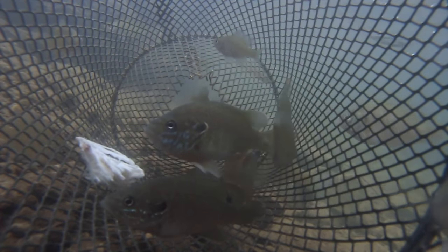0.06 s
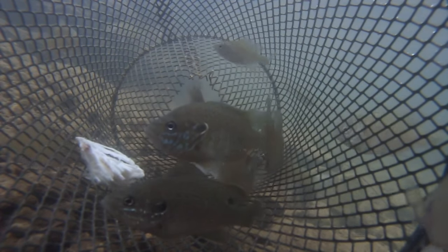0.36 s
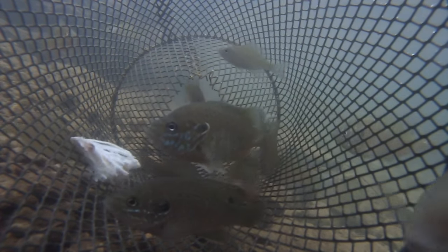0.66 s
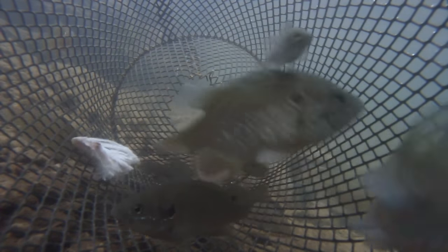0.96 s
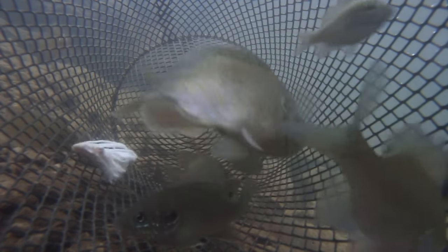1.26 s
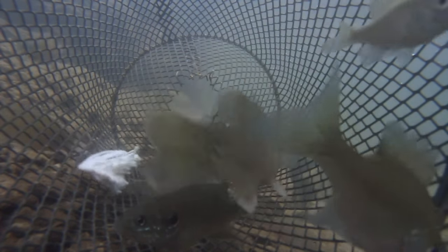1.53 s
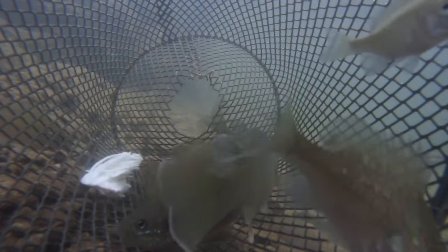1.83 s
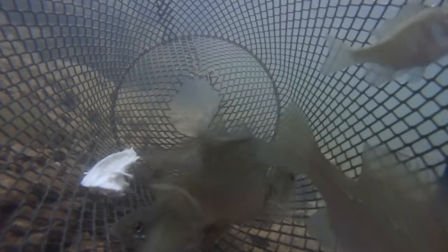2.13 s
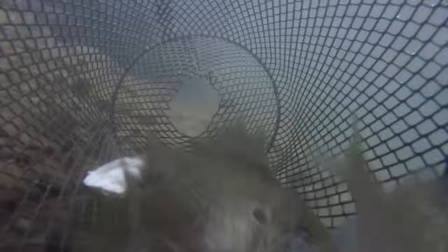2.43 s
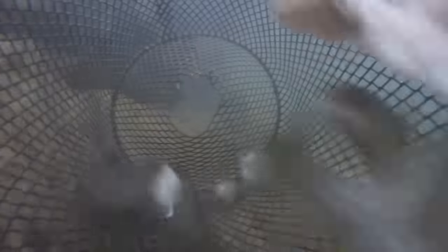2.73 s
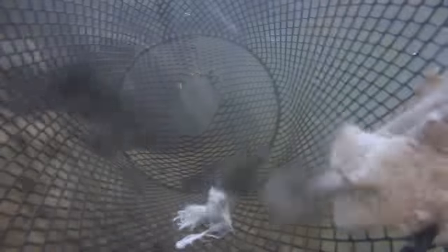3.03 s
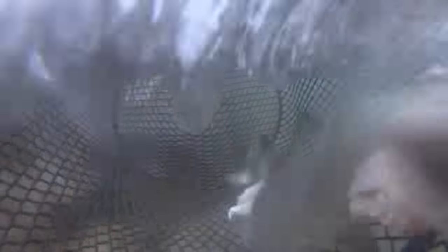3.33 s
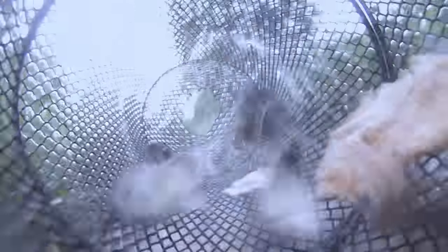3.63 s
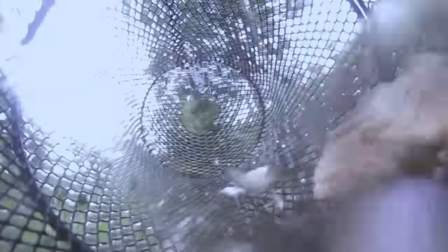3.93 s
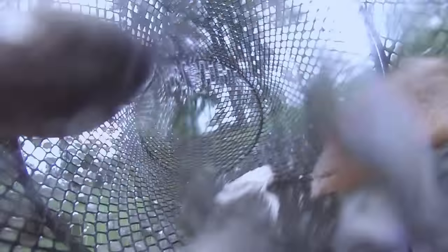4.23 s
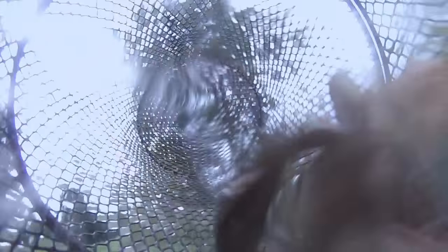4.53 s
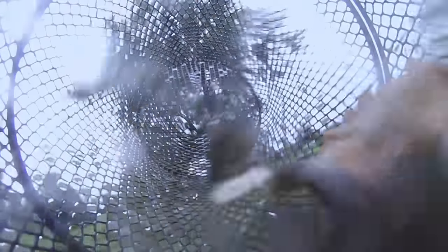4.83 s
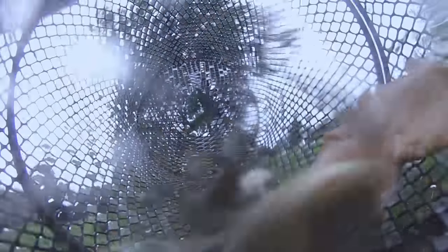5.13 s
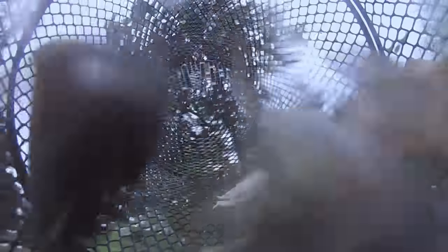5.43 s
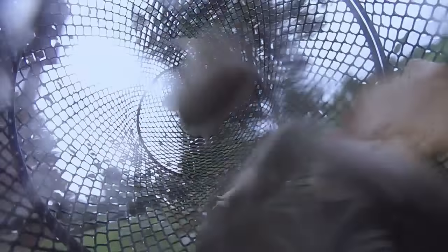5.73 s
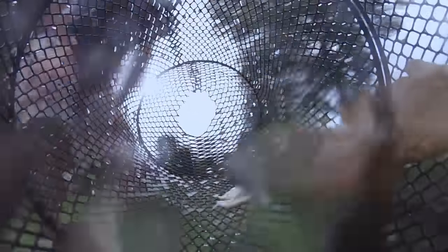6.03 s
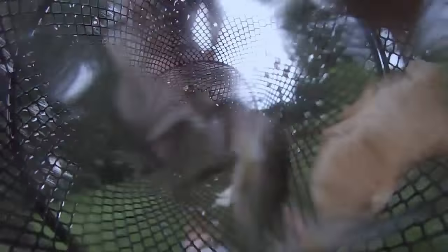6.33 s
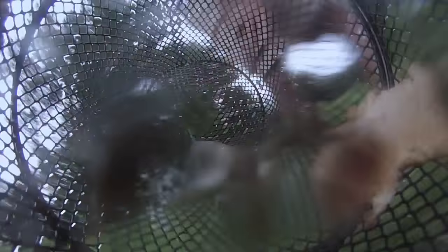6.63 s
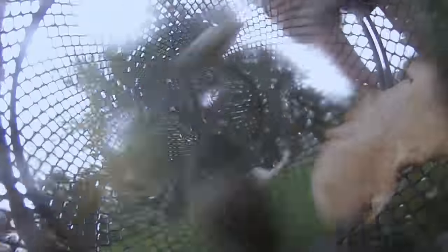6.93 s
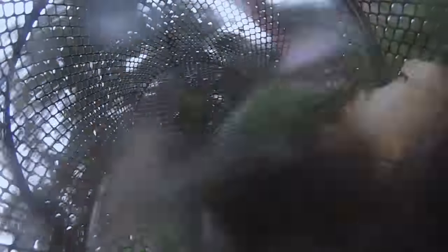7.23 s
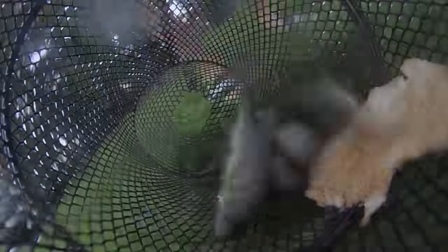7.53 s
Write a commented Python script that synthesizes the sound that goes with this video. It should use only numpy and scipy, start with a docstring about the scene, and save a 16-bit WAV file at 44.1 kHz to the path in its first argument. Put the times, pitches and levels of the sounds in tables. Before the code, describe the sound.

Inside a wire trap on a stream bed, a faint underwater hush is broken by a few dull knocks as fish bump the cage. After about two seconds the trap is hauled up with loud churning, bubbling and low thumps. Water then drains and spatters through the mesh in uneven spurts, drops smack right against the microphone, and fish flap on the wet wire.

```python
"""Hauling a wire fish trap

A stream bed, heard close up from a camera inside the trap. Fish bump the sunken cage with dull
knocks. The trap is hauled up: water churns and bubbles, then drains and spatters through the mesh.
Drops smack the housing right at the microphone and the stranded fish flap against the wet wire."""
import sys
import numpy as np
from scipy import signal
from scipy.fft import rfft, irfft, next_fast_len
from scipy.io import wavfile
from scipy.ndimage import map_coordinates

SR = 44100
rng = np.random.default_rng(int(sys.argv[2]) if len(sys.argv) > 2 else 0)


def master_out(mix):
    """Clip the mix to full scale and print it as 16-bit PCM to the path in sys.argv[1]."""
    frames = np.transpose(np.atleast_2d(mix))
    ceiling = np.clip(frames, -1, 1)
    pcm = np.round(ceiling * 32767).astype(np.int16)
    wavfile.write(sys.argv[1], SR, pcm)


N = 338235

# heaves of the trap and its thrashing fish: t/s, hold/s, sway/dB, churn/dB, spatter/dB
HEAVES = [(2.089, 0.069, -40.5, -53.5, -50), (2.253, 0.052, -22.5, -37.5, -46.5),
          (2.504, 0.07, -32, -18, -43), (2.617, 0.041, -7, -19.5, -27.5), (2.702, 0.085, -20, -12.5, -49),
          (2.926, 0.061, -17, -18, -34), (3.162, 0.035, -16.5, -30, -30), (3.205, 0.072, -21, -17.5, -25),
          (3.749, 0.034, -25, -18.5, -31), (3.828, 0.032, -10.5, -31, -28.5),
          (4.149, 0.044, -31, -24.5, -49), (4.309, 0.032, -27, -26.5, -28),
          (4.412, 0.081, -21, -23.5, -38.5), (4.641, 0.069, -18, -24, -31), (4.774, 0.06, -23, -45, -57),
          (4.927, 0.056, -29, -26.5, -32.5), (5.036, 0.066, -13.5, -20.5, -35.5),
          (5.285, .12, -17, -22.5, -53), (5.763, 0.018, -16, -35, -34), (5.85, 0.019, -13, -27.5, -31),
          (5.902, 0.026, -31, -15, -31.5), (6.027, 0.04, -34, -16, -29), (6.125, 0.071, -17, -22.5, -29.5),
          (6.372, 0.11, -24, -28, -29), (6.62, 0.041, -31, -27, -32), (6.771, .03, -16.5, -22, -37),
          (6.929, 0.019, -12.5, -30, -26.5), (7.004, 0.049, -22, -24, -26), (7.133, 0.058, -15, -24.5, -30),
          (7.281, 0.076, -31, -23, -29), (7.381, .05, -16, -27.5, -32.5), (7.568, 0.13, -21.5, -31, -33.5)]
# spectrum of water spattering off the mesh: f/Hz, level/dB
SPATTER_SPECTRUM = [(250, -12), (500, 7.5), (800, 1.5), (1080, -4), (1550, 3.5), (1850, 0), (2300, 4),
                    (2600, -2), (3000, -13.5), (4400, -22), (5300, -27), (6200, -35), (7200, -26),
                    (12000, -46)]
# spectrum of fine spray: f/Hz, level/dB
SPRAY_SPECTRUM = [(1500, -1.5), (3000, 12), (4400, 16.5), (5400, 11), (6250, 16.5), (7600, -3.5),
                  (9500, 3.5), (11500, -2.5), (13000, -2), (15000, -10)]


def water():
    """Water all round the microphone, leaving the mesh in uneven spurts as the trap is hauled."""
    sway, churn, spatter, spray = flow_strength()
    spurts = amp(5.28 * wobble(rate=59))
    flicks = spurts * amp(4.5 * wobble(rate=35))
    return (churning(sway, churn) + draining(spatter, spray, spurts, flicks)
            + escaping_air(churn, spatter, spray, flicks))


def flow_strength():
    """Envelopes of sway, churn, spatter and spray: each heave shifts water on top of the steady flow."""
    # first stir as the trap is gripped, then steady flow: t/s, churn/dB, spatter/dB, spray/dB
    stir = [(2.25, -48, -49.5, -67), (2.45, -30, -40, -65)]
    flow = [(2.5, -27, -34.5, -69), (2.67, -11.5, -29, -78), (2.79, -23.5, -32.5, -47),
            (2.97, -23, -31.5, -72), (3.16, -21, -48.5, -62), (3.41, -17.5, -30, -43.5),
            (3.78, -19, -33.5, -51), (4.06, -27, -40, -61), (4.26, -30, -40.5, -50.5),
            (4.69, -31, -42, -64), (5.38, -19.5, -28.5, -51.5), (5.69, -24.5, -35.5, -49),
            (6.26, -22.5, -35, -49.5), (6.54, -27, -42.5, -64), (6.75, -28.5, -40.5, -58),
            (7.15, -25, -33, -59), (7.67, -25.5, -36, -58)]
    times, *levels = np.vstack([stir, flow]).T
    churn, spatter, spray = [amp(np.interp(clock(N), times, db, left=-120)) for db in levels]
    power = np.array([amp(-1) * churn, amp(-4) * churn, spatter, spray]) ** 2  # churn feeds sway too
    rise_s = 0.018
    t = clock() - rise_s
    build_up = np.clip(1 + t / rise_s, 0, 1) ** 2
    for s, hold, sway_db, churn_db, spatter_db in HEAVES:
        spray_db = spatter_db - 16 - 11.5 * sunk(s)  # less spray under water
        heave = build_up * fade(np.maximum(t - hold, 0), t60=.11)
        for track, db in zip(power, (sway_db, churn_db, spatter_db, spray_db)):
            add(track, s - rise_s, (amp(db) * heave) ** 2)
    return np.sqrt(power)


def churning(sway, churn):
    """Moving water sways the cage with a low rumble and sloshes through it."""
    # spectra of the sway and the slosh: f/Hz, level/dB
    sway_spectrum = [(12, -48.5), (25, -1.5), (46, 11.5), (65, 7), (95, 7.5), (130, -12), (250, -71.5)]
    slosh_spectrum = [(60, -20), (115, -5.5), (160, 7.5), (210, 1.5), (260, -3.5), (420, -7), (560, -26.5),
                      (900, -18.5), (1500, -77.5)]
    rumble = unit(colour(patter(rate=510, spread_db=3.5), sway_spectrum))
    slosh = unit(colour(patter(rate=500, spread_db=2.5), slosh_spectrum))
    return amp(-5) * sway * rumble + amp(-3) * churn * slosh


def draining(spatter, spray, spurts, flicks):
    """Wash and mist leave the mesh; heavier droplets shatter, loose gouts land and run off."""
    wash = unit(spurts * colour(patter(rate=1400, spread_db=2), SPATTER_SPECTRUM))
    mist = unit(flicks * colour(patter(rate=2500, spread_db=4), SPRAY_SPECTRUM))
    ticks = splatter(patter(rate=38, spread_db=4), SPRAY_SPECTRUM, t60=.022, count=2048)
    gouts = splatter(patter(rate=16, spread_db=3), SPATTER_SPECTRUM, t60=.036, count=4096)
    return spatter * (amp(-5) * wash + amp(-11) * gouts) + spray * amp(-3) * (mist + ticks)


def escaping_air(churn, spatter, spray, flicks):
    """Big air pockets glug; small ones gurgle, fizz, and plink once the mesh breaks the surface."""
    t = clock(N)
    surfaced = np.interp(t, [2.55, 2.65], [0, 1])
    glugs = bubbles(centre_hz=200, spread=.45, cycles=9, size_db=12, count=420, length=4096)
    gurgle = bubbles(centre_hz=1900, spread=.22, cycles=17, size_db=14, count=800)
    plinks = surfaced * bubbles(centre_hz=3700, spread=.25, cycles=28, size_db=22, count=380)
    fizz = unit(flicks * bubbles(centre_hz=7500, spread=.3, cycles=24, size_db=20, count=500))
    return (churn * amp(-9 + 4.7 * sunk(t)) * glugs
            + spatter * (amp(-10.5) * gurgle + amp(-25 + 7.8 * sunk(t)) * plinks)
            + spray * amp(-5.5) * fizz)


def lurches():
    """Each heave throws the whole cage into one short, heavy swing."""
    out, t = np.zeros(N), clock(count=16384)
    for s, _, sway_db, _, _ in HEAVES:
        hz = 48.2 * np.exp(0.2 * rng.uniform(-0.92, 1))
        add(out, s, amp(sway_db + 3) * ring(t, hz, t60=.19, attack=.012))
    return out


def drops():
    """A drop cracks on the housing, knocks its shell and snaps around a tiny ringing bubble."""
    # the largest drops and bursting bubbles: t/s, ring/dB, f/Hz, crack/dB, knock/dB
    hits = [(2.586, -14.5, 2880, -18.5, -15), (2.613, -26, 2320, -13, -15), (2.675, -20, 2990, -39, -24),
            (2.784, -15, 2880, -28, -34), (2.799, -25, 4230, -30, -24), (2.810, -21, 3200, -14.5, -44),
            (2.856, -10, 2370, -33, -11), (2.933, -14.5, 2940, -31, -45), (2.990, -5.5, 2340, -45, -42),
            (3.075, -28.5, 2350, -39, -45), (3.509, -24, 3900, 0.5, -24), (3.5187, -3, 3660, -26, -19),
            (3.624, -8, 4100, -37, -22), (3.824, -14.5, 4000, -18, -20), (3.862, -15.5, 2460, -6.5, -44),
            (3.935, -9.5, 2430, -10, -9.5), (3.950, -16, 4600, -38, -22), (4.046, -4, 4250, -6.5, -12.5),
            (4.079, -14.5, 2450, -14, -19.5), (4.126, -19.5, 5340, -36, -39), (4.289, -6.5, 2740, 4, -14),
            (4.511, -8, 4430, 0.5, -15), (4.6416, -18.5, 3330, -12, -18), (4.793, -20.5, 2270, -17, -45),
            (4.817, -8, 2470, -1, -20), (4.836, -6.5, 4000, -15, -16.5), (5.394, -11, 2340, -7, -41),
            (5.532, -16, 2420, -14, -21), (5.705, -10.5, 3870, 7.5, -16.5), (5.708, -11.5, 2430, -14, -12),
            (5.790, -20, 2330, -15, -24), (5.851, -11, 2510, -10.5, -36), (6.053, -16, 2510, -11.5, -27),
            (6.078, -22, 2340, -7, -43), (6.242, -12.5, 2210, -36, -38), (6.387, -15, 2240, -5.5, -29),
            (6.4503, -6, 2510, -5, -7), (6.4534, 1, 2770, -30, -20), (6.453, -5, 5220, -18, -30),
            (6.517, -24.5, 2900, -50, -34), (6.671, -21, 2400, -37, -20.5), (6.786, -12, 3650, 6, -28),
            (6.853, -30, 2460, -15, -45), (7.104, -16, 4680, -10, -20), (7.2907, -27, 2300, -39, -10)]
    # spectra of the crack and the shell's knock: f/Hz, level/dB
    crack_spectrum = [(1500, -31), (3700, 4), (4500, 3), (5400, 5), (7000, 1.5), (10000, -0.5), (14300, -5),
                      (16000, -13)]
    shell_spectrum = [(200, 21.5), (600, 8.5), (1100, 7.5), (2200, 12.5), (3000, -49), (4500, -44),
                      (9000, -50)]
    out, t = np.zeros(N), clock(count=4096)
    for s, db, hz, crack_db, knock_db in hits:
        clean_db = 3 * sunk(s)  # under water the bubble rings more purely
        bubble = amp(db + clean_db) * ring(t, hz, t60=.011, attack=.00048)
        snap_spectrum = [(hz / 3, -26), (hz, 0), (hz * 2, -17), (hz * 4, -36)]
        snap = amp(db - 8 - clean_db) * burst(t, snap_spectrum, t60=.012)
        crack = amp(crack_db) * burst(t, crack_spectrum, t60=.0038) * onset(t, .0011)
        shell = amp(knock_db) * burst(t, shell_spectrum, t60=.021)
        housing = amp(db - 6.5) * ring(t, hz=3695, t60=.013, attack=.00047)
        add(out, s, bubble + snap + crack + shell + housing)
        add(out, s + rng.uniform(.0001, .0004), 0.4 * crack)  # echo in the water film
    return out


def slaps():
    """A slap shakes the wet mesh, squeezes out pockets of air and throws off a short spray."""
    # splashes and wet tail slaps: t/s, splash/dB, spray/dB, splash t60/s
    hits = [(2.478, -25.5, -65, .033), (2.709, -22.5, -55, 0.064), (2.761, -12.5, -39, .041),
            (2.947, -19, -25.5, .07), (3.138, -17.5, -59, .033), (3.262, -24, -37, 0.044),
            (3.282, -17, -43, .033), (3.603, -23, -57, .19), (3.656, -27, -38, .3),
            (3.759, -15.5, -36, .051), (3.905, -29, -37, .11), (4.158, -26, -34, .09),
            (4.317, -26, -38, .15), (4.415, -33, -47, .14), (4.512, -22.5, -13, .037),
            (4.659, -33, -33.5, .27), (5.034, -23.5, -35, .15), (5.08, -16.5, -48, .11),
            (5.297, -23, -36, .058), (5.379, -20.5, -40, .057), (5.425, -24.5, -26, .15),
            (5.497, -18, -30.5, .068), (5.712, -20.5, -15, .067), (5.934, -22, -40, .16),
            (6.024, -23.5, -32.5, .076), (6.068, -19.5, -27, .074), (6.113, -28, -35.5, .12),
            (6.169, -19, -27, .15), (6.262, -19.5, -27.5, .038), (6.612, -26, -34, .079),
            (6.63, -28.5, -29.5, .072), (6.786, -21, -28.5, .1), (6.984, -20.5, -29, .13),
            (7.042, -24, -32.5, .13), (7.292, -25, -23.5, 0.031), (7.305, -14, -40, .057),
            (7.362, -21, -34, .072), (7.446, -27.5, -28.5, .14)]
    out, t = np.zeros(N), clock(count=12000)
    for s, db, spray_db, t60 in hits:
        splash = amp(db) * burst(t, SPATTER_SPECTRUM, t60)
        spray = amp(spray_db) * burst(t, SPRAY_SPECTRUM, 0.39 * t60)
        add(out, s, splash + spray)
        # three pockets ring, weaker as the slap dies away
        for delay, hz in rng.uniform([0, 1350], [t60 / 5, 2500], (3, 2)):
            add(out, s + delay, amp(db + 2) * fade(delay, t60) * ring(t, hz, t60=.018, attack=.0005))
    return out


def thuds():
    """A shove on the housing: a broad push with a sharp pop at its front, then a short low swing."""
    # shoves by water and fish: t/s, push/dB, swing f/Hz, pop/dB
    shoves = [(2.477, -4.5, 213, -12), (2.585, -11, 154, 4), (2.611, -20, 90, 3.5), (2.627, 2, 88, -22),
              (2.76, -1, 157, -2), (2.804, -13, 163, -3.5), (2.8249, 2.5, 120, -9), (3.286, 1, 135, -10),
              (3.325, -1.5, 170, -31), (3.935, -12, 69, 0.5), (4.043, -6.5, 178, -14),
              (4.512, -7.5, 85, -17), (4.77, -10, 186, -38), (5.376, -8, 68.5, -15), (5.517, 4, 52.5, -28),
              (5.707, -6, 73, -28), (5.932, -1.5, 53, -4), (6.028, -10, 153, -13), (6.166, -2, 159, -27),
              (6.296, -3.5, 67.4, -31), (6.363, -7.5, 158, -11.5), (7.291, -9, 99, 4)]
    out, t = np.zeros(N), clock(count=8192)
    for s, db, hz, pop_db in shoves:
        blow = amp(db) * push(t, width=.0016) + amp(pop_db) * push(t, width=.00048)
        swing = amp(db - 9.5) * ring(t, hz, t60=.1, attack=.0004)
        add(out, s, -blow * onset(t, .00015) - swing)
    return out


def knocks():
    """Each bump of a fish scrapes the wire, shakes the mesh and sets the water-damped cage swaying."""
    # bumps on the sunken cage: t/s, scrape/dB, sway/dB, hoop/dB, scrape t60/s
    bumps = [(0.047, -70, -39, -47.5, .07), (0.174, -55.5, -39, -42, .085), (.476, -45, -25, -24, .1),
             (0.71, -64, -35, -44.5, .07), (.816, -41.5, -19, -23, .1), (.943, -32.5, -37, -18.5, .12),
             (.951, -14.5, -2, -18, 0.021), (.983, -45, -35, -40, .05), (1.021, -38, -19, -22, 0.083)]
    # cage modes under water: f/Hz, level/dB, t60/s, part (0 sway, 1 hoop)
    modes = [(44.9, -1, 0.32, 0), (119, 5, 0.18, 1), (135.8, -9.5, 0.46, 1)]
    # spectra of shaken mesh and scraped wire: f/Hz, level/dB
    mesh_spectrum = [(120, -9), (250, -3), (340, -5.5), (440, -1.5), (560, -19), (900, -47)]
    wire_spectrum = [(200, -15), (600, 1), (1100, 2), (1400, 1), (2200, 1.5), (3000, -8.5), (4500, -27),
                     (9000, -39)]
    out, t = np.zeros(N), clock()
    for s, scrape_db, sway_db, hoop_db, scrape_t60 in bumps:
        for hz, db, t60, part in modes:
            detuned_hz = hz * (1 + 0.066 * rng.uniform(-1, 1))
            waver = 0.8 * wobble(hz / 2, count=len(t))  # moving water bends the phase
            mode = np.sin(2 * np.pi * detuned_hz * t + waver) * fade(t, t60) * onset(t, .0058)
            add(out, s, amp((sway_db, hoop_db)[part] + db) * mode)
        mesh = burst(t, mesh_spectrum, t60=.16) * onset(t, .0017)
        scrape = burst(t, wire_spectrum, scrape_t60) * onset(t, .00038)
        add(out, s, amp(hoop_db - 9) * mesh + amp(scrape_db) * scrape)
    return out


def noise_floor():
    """Faint underwater hush and the microphone's thin high hiss."""
    # underwater hush, with microphone hiss at 11-13 kHz: f/Hz, level/dB
    floor_spectrum = [(15, -17), (25, -5), (53, 2), (450, -12.5), (1000, -17), (3400, -24.5), (6000, -28.5),
                      (9800, -33), (11000, -24.5), (12000, -27), (13000, -36), (15000, -31)]
    return amp(-58.5) * unit(colour(rng.standard_normal(N), floor_spectrum))


def sunk(s):
    """1 while the trap is under water, 0 once it is in the air."""
    return np.interp(s, [3.5, 3.9], [1, 0])


def bubbles(centre_hz, spread, cycles, size_db, count, length=1024):
    """Bubbles at random times; each rings for some cycles and rises a little in pitch."""
    when, size = rng.random((2, count, 1))
    hz = np.clip(centre_hz * np.exp(spread * rng.standard_normal((count, 1))), 60, SR / 4)
    t = clock(length)
    age = t * hz / cycles
    rise = 1 + 0.027 * np.minimum(age, 1)
    sound = amp(size_db * size ** 3) * np.sin(2 * np.pi * hz * t * rise) * fade(age, 0.99)
    at = (when * N).astype(int) + np.arange(length)
    return unit(np.bincount(at.ravel(), sound.ravel(), N)[:N])


def patter(rate, spread_db):
    """Random droplet impacts of uneven size, rate a second, at rms 1."""
    size = amp(spread_db * np.minimum(rng.standard_normal(N), 2)) * rng.choice([-1, 1], N)
    return unit(size * (rng.random(N) < rate / SR))


def splatter(impacts, spectrum, t60, count):
    """Each impact breaks up into a short tail of coloured noise."""
    tails = signal.fftconvolve(np.abs(impacts), fade(clock(count), t60))[:N]
    return unit(colour(tails * rng.standard_normal(N), spectrum))


def push(t, width):
    """One steep rise of pressure and the shallow suction after it."""
    u = t / width
    return u * (2 - u) * np.exp(-u)


def ring(t, hz, t60, attack):
    """One damped mode."""
    return np.sin(2 * np.pi * hz * t) * fade(t, t60) * onset(t, attack)


def burst(t, spectrum, t60):
    """A coloured puff of noise that starts near rms 1 and dies away."""
    shape = fade(t, t60)
    puff = colour(rng.standard_normal(len(t)) * shape, spectrum)
    return puff * np.linalg.norm(shape) / np.linalg.norm(puff)


def colour(x, spectrum):
    """Minimum-phase filter of unit energy, shaped by rows of f/Hz, level/dB."""
    size = 4096
    hz, db = np.transpose(spectrum)
    gain = amp(np.interp(np.log(np.fft.rfftfreq(size, 1 / SR) + 1), np.log(hz), db))
    cepstrum = irfft(np.log(gain + 1e-6))
    cepstrum[1:size // 2] *= 2
    cepstrum[size // 2 + 1:] = 0
    response = irfft(np.exp(rfft(cepstrum)))
    return signal.fftconvolve(x, response / np.linalg.norm(response))[:len(x)]


def wobble(rate, count=N):
    """A smooth random curve, rate knots a second."""
    return map_coordinates(rng.standard_normal(4096), [clock(count) * rate], mode="mirror")


def onset(t, attack):
    """Rise from 0 to 1 with time constant attack."""
    return 1 - np.exp(-t / attack)


def fade(t, t60):
    """Exponential decay by 60 dB in t60."""
    return np.exp(-np.log(1000) * t / max(t60, 1e-4))


def add(track, s, sound):
    """Mix a sound into the track at time s."""
    part = track[max(0, round(s * SR)):][:len(sound)]
    part += sound[:len(part)]


def amp(db):
    """Decibels to gain."""
    return 10 ** (np.asarray(db) / 20)


def unit(x):
    """Scale to rms 1."""
    return x / np.sqrt(np.mean(x ** 2) + 1e-20)


def clock(count=SR // 2):
    """Sample times from zero."""
    return np.arange(count) / SR


def scene():
    """Everything in mono, from inside the trap."""
    return (noise_floor() + knocks() + water() + lurches() + drops() + slaps() + thuds())[None]


def record(dry):
    """The camera rounds off the highest peaks and passes 12 Hz to 15.3 kHz."""
    rounded = dry / (1 + np.abs(dry) ** 6) ** (1 / 6)
    size = next_fast_len(N + SR // 2)
    hz = np.fft.rfftfreq(size, 1 / SR)
    low_cut = 1j * hz / (12 + 1j * hz)
    high_cut = 1 / (1 + (hz / 15300) ** 60)
    return irfft(rfft(rounded, size) * low_cut * high_cut, size)[..., :N]


dry = scene()
out = record(dry)
master_out(out)
```